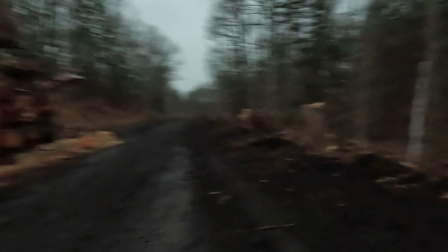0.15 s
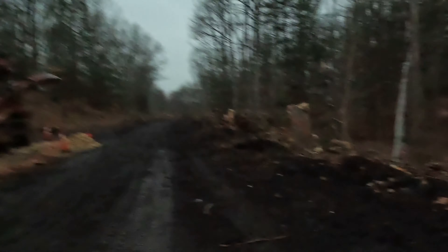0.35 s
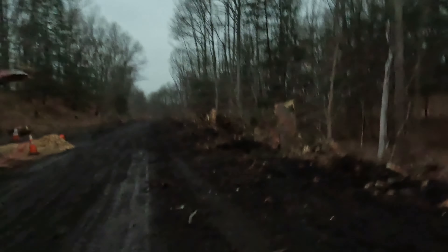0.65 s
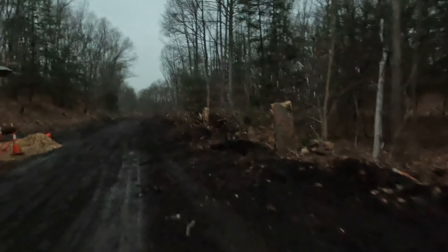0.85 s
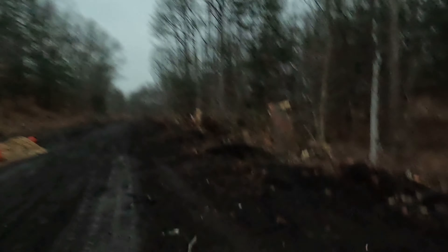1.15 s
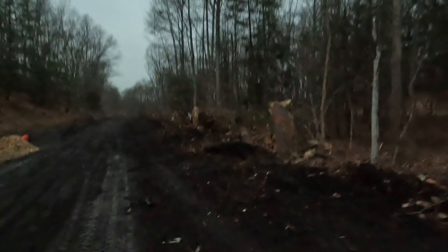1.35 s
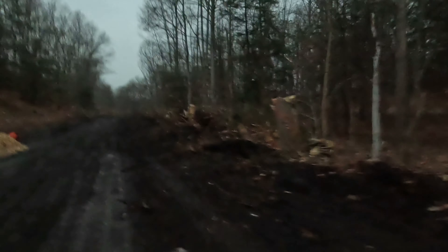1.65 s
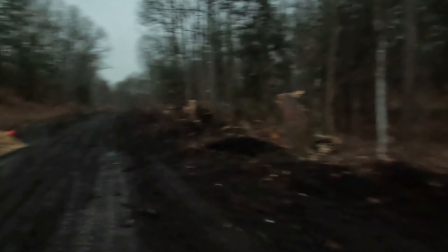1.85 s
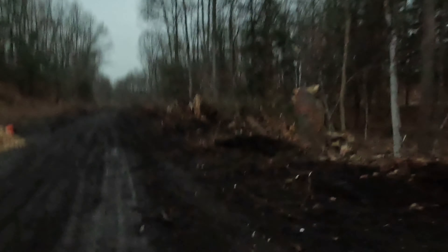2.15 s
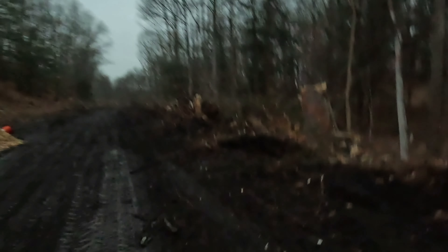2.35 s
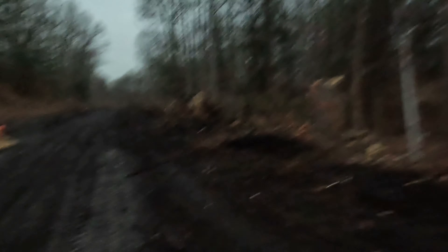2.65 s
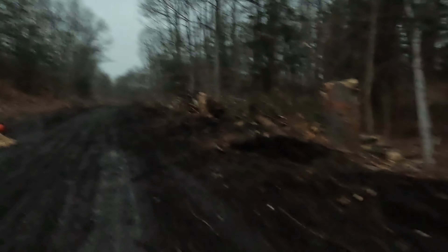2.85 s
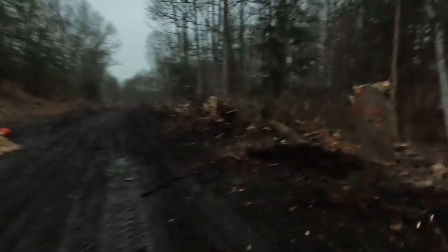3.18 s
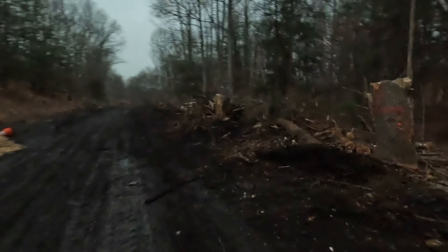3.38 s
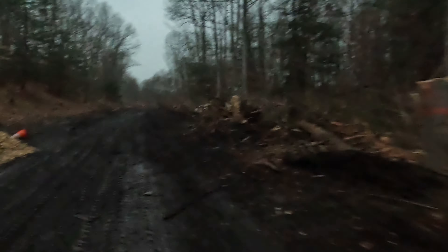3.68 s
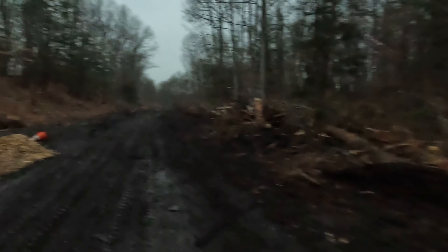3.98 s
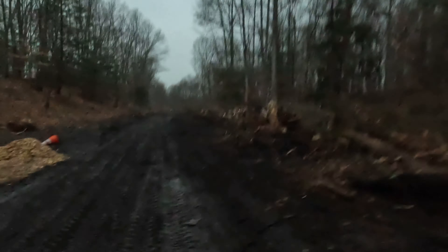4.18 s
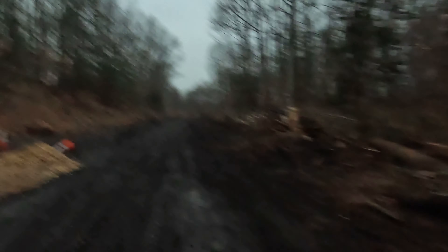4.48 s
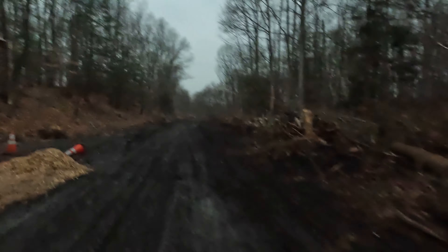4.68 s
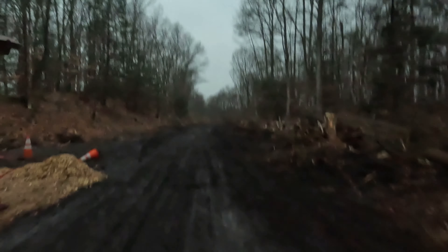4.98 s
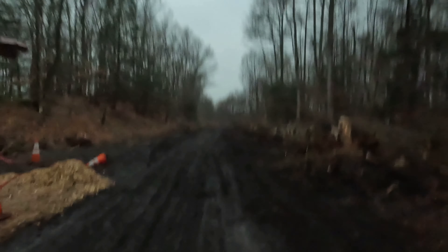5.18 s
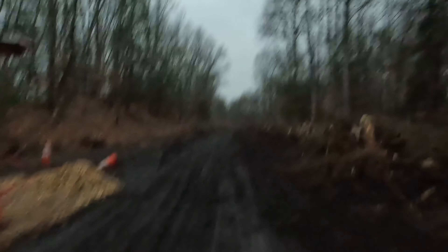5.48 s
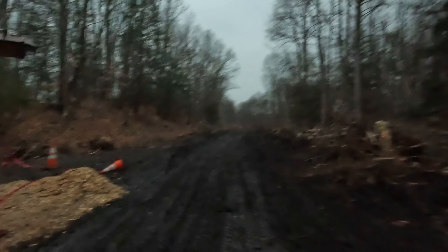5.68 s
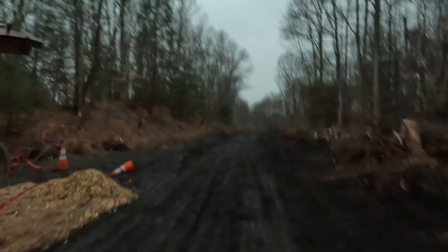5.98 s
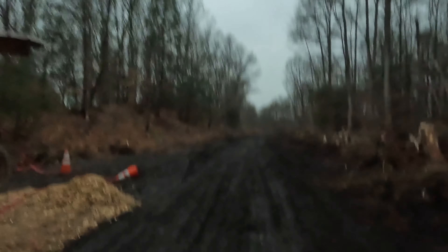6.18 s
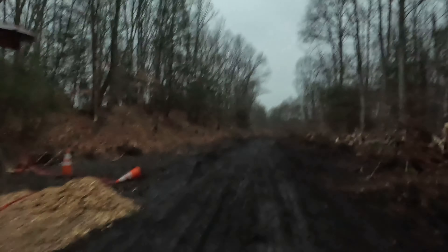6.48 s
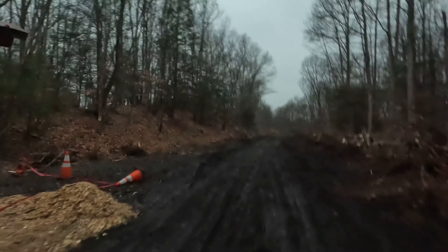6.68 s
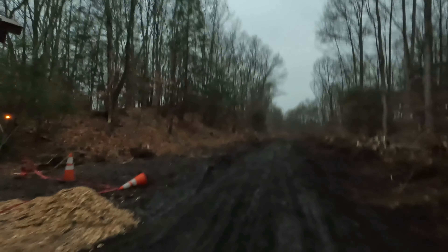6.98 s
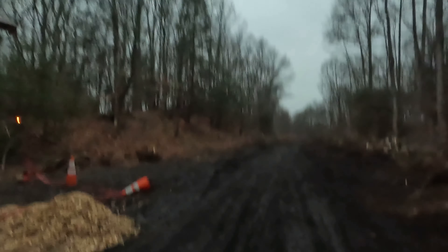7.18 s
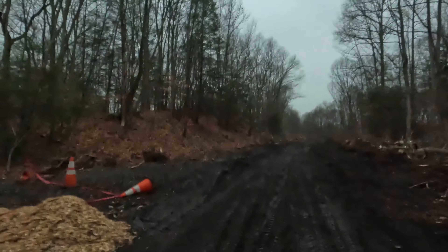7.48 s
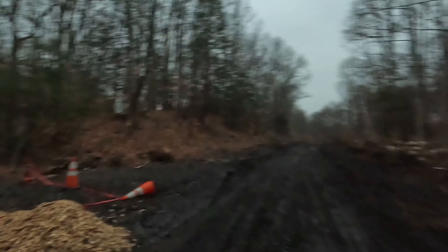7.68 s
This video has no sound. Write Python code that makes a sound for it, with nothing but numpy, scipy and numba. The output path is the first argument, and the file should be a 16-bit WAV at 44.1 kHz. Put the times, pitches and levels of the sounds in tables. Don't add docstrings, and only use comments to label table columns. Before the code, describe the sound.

Nearly eight seconds of walking on a soaked dirt track in woods, heard from a small handheld stereo microphone. Low wind rumble and flutter last throughout, swelling in short buffets with the arm's swing, over a faint steady hiss of fine rain. From 0 to 1 s soft boot thuds and gurgles alternate; at about 1.0 to 1.3 s a brighter wet squelch bursts with popping bubbles and sharp ticks. Lighter squishes follow near 1.5, 2.3 and 2.7 s, then thuds and sticky crackles from 3.2 to 3.8 s. Smaller squelches come around 4.2 and 4.4 s. At 5.1 s a crisp splash with bright ticks; at 5.55 s a heavy drop knocks the housing with a snap and low bump. Strong sucking steps at 6.1 to 6.3 s, then bubbling squelches and fine spray from 7.1 s to the end.

```python
import sys
import numpy as np
from scipy import signal
from scipy.fft import rfft, irfft, next_fast_len
from scipy.io import wavfile
from scipy.ndimage import uniform_filter1d
from numba import njit

SR = 44100
rng = np.random.default_rng(int(sys.argv[2]) if len(sys.argv) > 2 else 0)


def convert_level_to_amplitude(level_db):
    exponent = np.asarray(level_db, float) / 20
    return 10 ** exponent


def store_wav(level_fs):
    pcm = np.round(np.clip(np.atleast_2d(level_fs), -1, 1) * 32767)
    wavfile.write(sys.argv[1], SR, pcm.T.astype(np.int16))


N = 345679


def on_hz(table, hz):
    table = np.array(table)
    return np.interp(np.log(hz + 1), np.log(table[:, 0]), table[:, 1])


def curves(table):
    return np.interp(np.arange(N) / SR, *np.transpose(table))


def unit(x):
    return x / np.sqrt(np.mean(x ** 2))


def band(x, lo_hz, hi_hz, order=2):
    return signal.sosfilt(signal.butter(order, [lo_hz, hi_hz], "band", fs=SR, output="sos"), x)


def walk(rate_hz):
    hold = int(SR / rate_hz)
    levels = np.repeat(rng.standard_normal(N // hold + 1), hold)
    smooth = uniform_filter1d(uniform_filter1d(levels, hold), hold)
    return unit(smooth[:N])


def ports(colour, drops=0):
    # pitch_hz, likeness (0-1)
    likeness = [(60, 0.94), (250, 0.95), (640, 0.35), (1400, 0.47), (3100, 0.37), (5500, 0.61),
                (9000, 0.47), (13000, 0.02)]
    # pitch_hz, left_minus_right_db
    balance = [(60, -0.5), (110, 0.5), (200, -0.5), (380, -0.5), (700, 6), (1290, 3), (2380, 1),
               (4400, -0.5), (8120, 1), (13000, 5.5)]
    size = next_fast_len(N)
    hz = np.arange(size // 2 + 1) * SR / size
    alike = np.clip(on_hz(likeness, hz), 0, 1)
    lean_db = on_hz(balance, hz) / 2
    mid, side = rfft(rng.standard_normal((2, N)) + drops, size)
    mid, side = mid * np.sqrt(1 + alike), side * np.sqrt(1 - alike)
    pair = np.array([(mid + side) * convert_level_to_amplitude(lean_db), (mid - side) * convert_level_to_amplitude(-lean_db)])
    return unit(irfft(pair * convert_level_to_amplitude(on_hz(colour, hz)), size)[:, :N])


@njit
def ring(start, turn, fade, glide, left, right, count):
    out = np.zeros((2, count))
    for k in range(len(start)):
        z, p, swell, i = 1 + 0j, turn[k], 1., int(start[k])
        while abs(z) > .003 and i < count:
            out[0, i] += left[k] * z.imag * (1 - swell)
            out[1, i] += right[k] * z.imag * (1 - swell)
            z *= fade[k] * np.exp(1j * p)
            swell *= fade[k] ** 2
            p = min(p * glide[k], 3.)
            i += 1
    return out


def grains(s, size, hz, pan_db, cycles, rise):
    step = np.clip(hz, 10, 18000) / SR
    cycles = np.clip(cycles, .5, 40) + 0 * s
    near = (convert_level_to_amplitude(-pan_db / 2) + convert_level_to_amplitude(pan_db / 2)) / 5
    left, right = size * convert_level_to_amplitude(pan_db / 2) / near, size * convert_level_to_amplitude(-pan_db / 2) / near
    return ring(s * SR, 2 * np.pi * step, convert_level_to_amplitude(-60 * step / cycles), (1 + rise) ** step, left, right, N)


def swarm(rate_hz, lo_hz, hi_hz, cycles, rise, scatter_db, pan_db):
    when, pitch, luck, place = rng.random((int(rate_hz * N / SR), 4)).T
    size = convert_level_to_amplitude(-scatter_db * np.log(1 - .9 * luck))
    hz = lo_hz * (hi_hz / lo_hz) ** pitch
    return unit(grains(when * N / SR, size, hz, pan_db + 8 * (place - .5), cycles, rise))


def bursts(s, db, hz, pan_db, spread_s, detune_oct, cycles):
    late, pitch = rng.random((len(s), 6, 2)).T
    late[0], pitch[0] = 0, .5
    crack = grains(s, convert_level_to_amplitude(db + 1), .95 * hz, pan_db, 2.5, -.1)
    start_s = s + spread_s * late
    level = convert_level_to_amplitude(db - 13.6 * late)
    pitch_hz = hz * 2 ** (detune_oct * (pitch - .5))
    pans_db = pan_db * np.ones((6, 1))
    return crack + grains(start_s.ravel(), level.ravel(), pitch_hz.ravel(), pans_db.ravel(), cycles, 0.0075)


def rain():
    # pitch_hz, density_db (per Hz)
    hiss = [(600, -15), (860, -15.5), (960, -3.5), (1300, -1), (2500, 0.5), (5000, -2), (6000, -3),
            (7700, -7.5), (8200, -17), (9200, -17), (10400, -11.5), (11300, -17), (12400, -16.5),
            (15000, -31)]
    drops = 4.8 * (rng.random((2, N)) < .006) * rng.standard_normal((2, N))
    return ports(hiss, drops) * convert_level_to_amplitude(-48 + 0.17 * walk(3.13) + 0.62 * walk(30))


def mist(wet):
    top = signal.sosfiltfilt(signal.butter(2, 11500, "high", fs=SR, output="sos"), wet)
    return top * (convert_level_to_amplitude(2.3 * walk(22)) - 1)


def breeze():
    # start_s, level_db
    gust = [(0, -42.5), (.9, -42), (1.55, -45.5), (2, -41.5), (2.7, -40), (3.1, -42.5), (3.45, -43),
            (4, -45.5), (4.5, -43.5), (4.9, -46.5), (5.4, -45), (5.95, -48), (6.5, -43.5), (7, -46),
            (7.3, -45.5), (7.84, -40.5)]
    # centre_s, swell_db, half_width_s
    buffets = [(.26, 7.5, 0.062), (.61, 3, 0.022), (.74, -2, 0.044), (1.18, 8, 0.076), (1.72, 2.5, 0.058),
               (1.81, 6, 0.089), (3.03, 4.5, 0.069), (3.24, 5, 0.061), (3.58, 0, 0.037), (3.71, 7, 0.1),
               (4.21, 5.5, 0.13), (4.78, 4, 0.13), (5.15, 9.5, 0.067), (5.59, 12, 0.039),
               (5.76, 6.5, 0.081), (6.14, 7, 0.06), (6.3, 4.5, 0.05), (6.62, 1.5, 0.076), (7.12, 6, 0.12),
               (7.51, 4.5, .11)]
    # start_s, flutter_gain_db
    facing = [(0, 1.5), (1.3, -2), (1.9, -0.5), (2.3, 2.5), (2.8, 1), (3.2, -2), (3.7, -2), (4.4, 2.5),
              (5.9, -2), (6.38, 4), (6.8, -1), (7.84, 0.5)]
    t = np.arange(N) / SR
    swing_db = sum(db * np.clip(1 - np.abs(t - s) / (2 * wide), 0, 1) for s, db, wide in buffets)
    rumble_db = curves(gust) + swing_db
    flutter_db = -51 + 0.58 * (rumble_db + 45) + curves(facing)
    return rumble_db, flutter_db


def wind(rumble_db, flutter_db):
    # pitch_hz, density_db (per Hz)
    eddies = [(12, -4.5), (28, 0), (60, -2.5), (110, -7.5), (170, -13.5), (260, -18), (400, -26),
              (600, -31.5), (900, -34), (1300, -73)]
    rumble_db = np.minimum(rumble_db, -31) + 2.23 * walk(9)
    flutter_db = np.minimum(flutter_db, -43) + .7 + 2.1 * walk(30) + .8 * walk(6)
    deep = unit(band(ports(eddies), 11.0, 77.5)) * convert_level_to_amplitude(rumble_db)
    return deep + unit(band(ports(eddies), 85, 850)) * convert_level_to_amplitude(flutter_db)


def ticks():
    # start_s, level_db (peak), pitch_hz, top_db (top octave)
    hits = [(0.0908, -29.5, 4650, -62), (0.624, -40, 6500, -58), (1.0147, -26.5, 5300, -64),
            (1.0765, -35, 5530, -58), (1.1672, -36, 5180, -56), (1.21, -40, 5060, -45),
            (1.303, -33, 5310, -55), (2.0228, -38, 5070, -55), (2.1904, -35, 5400, -60),
            (2.2515, -30, 5040, -61), (2.2937, -37, 5130, -52), (2.6808, -41, 4380, -63),
            (2.7143, -33.5, 5190, -62), (3.237, -32, 5300, -55), (3.354, -29, 5710, -47),
            (3.4908, -30, 5740, -60), (3.775, -33, 5500, -58), (4.144, -36, 4220, -60),
            (4.2378, -38, 4240, -55), (5.105, -29, 5700, -58), (5.111, -33, 3860, -62),
            (5.1135, -26, 5950, -56), (5.359, -36, 5000, -58), (5.5432, -29, 6300, -48),
            (5.745, -42, 5000, -64), (5.93, -40, 6500, -60), (6.0256, -35, 5900, -58),
            (6.573, -30, 5030, -58), (6.7376, -36, 6260, -65), (7.555, -41, 4030, -50)]
    s, db, hz, top_db = np.transpose(hits)
    pan_db = 4 + 0 * s
    body = bursts(s, db - 8.5, hz, pan_db, .008, 0.51, 27)
    return body + bursts(s, top_db + 8.5, 9000 + 0 * s, pan_db, 0.0016, 0.99, 6.9)


def snaps():
    # start_s, level_db (peak), left_minus_right_db
    drops = [(0.624, -34, 9), (0.6714, -33, 2.0), (0.7302, -39, 1.0), (0.7554, -40, 0.5),
             (1.2087, -37, 2.5), (1.6534, -38, 1.0), (1.8603, -36, -0.5), (2.3014, -42, 0.0),
             (3.3538, -38, -3), (3.4014, -41, 0.5), (3.636, -37, 1.0), (4.1435, -44, 2.5),
             (4.5555, -40, 3.0), (5.5433, -33, 13), (5.7422, -32, 7.0), (5.758, -41, 2.5),
             (5.9274, -42, 2.0), (6.571, -37, 2.5), (6.7825, -40, 0.5), (7.5594, -43, 3.0)]
    s, db, pan_db = np.transpose(drops)
    lag_s = 0.000997
    return sum(grains(s + lag_s, convert_level_to_amplitude(db + gain_db), hz + 0 * s, pan_db, cycles, 0)
               for hz, gain_db, cycles in [(4700, 1.5, 4.8), (7200, -0.5, 5.3), (10900, -4, 6)])


def knock():
    # start_s, level_db (peak), pitch_hz, left_minus_right_db, cycles (to -60 dB),
    # push (relative size, positive push or negative pull)
    modes = [
        (5.5455, -17, 133, 24, 3.8, -1.4),
        (5.5489, -10.5, 76, 14, 4.0, 0.88),
        (5.5445, -15.5, 33, -30, 6.5, 0.85),
        (5.5478, -9.5, 105, -30, 1.9, 1),
        (5.5575, -18, 79, -30, 2.3, -1.1),
        (5.5462, -19, 3300, -8, 7.6, 0.96),
        (5.5436, -21, 1090, -18, 14, 0.9),
        (5.5426, -21, 86, -16, 1.6, 1),
        (5.5555, -29, 950, -16, 3.5, 0.9),
        (5.572, -20, 14, -8, 5, -0.93),
    ]
    s, db, hz, pan_db, cycles, push = np.transpose(modes)
    return grains(s, push * convert_level_to_amplitude(db - 6), hz, pan_db, cycles, -.03)


def bubbles():
    # start_s, level_db (peak), pitch_hz, left_minus_right_db
    surface = [(0.233, -43, 900, 4), (0.264, -42, 300, 1), (0.286, -48, 860, 7), (0.494, -43, 2230, 7),
               (0.715, -41, 600, 4), (1.013, -45, 2450, 5), (1.025, -44, 910, 5), (1.0145, -40, 1500, 6),
               (1.168, -43.5, 905, 8), (1.169, -46, 1800, 4), (1.184, -41, 1850, 3), (1.188, -40, 338, 1),
               (1.506, -42, 1630, 5), (2.303, -48, 507, 7), (2.321, -48, 905, 3), (2.331, -47, 950, 5),
               (3.252, -47, 463, 2), (3.467, -42.5, 1720, 4), (3.482, -45, 497, 1), (3.609, -41, 294, -4),
               (3.776, -44, 1640, 5), (4.259, -50, 990, 4), (4.401, -43, 1590, 2), (4.432, -42, 1840, 5),
               (5.113, -46, 550, 2), (5.182, -44, 2190, 5), (5.187, -41, 1430, 5), (5.878, -43, 950, 5),
               (6.123, -44, 940, 6), (6.142, -41, 1590, 5), (6.156, -41, 1460, 3), (6.205, -51, 680, 3),
               (6.219, -45, 960, 9), (6.489, -47, 1050, 5), (6.489, -47, 1940, 9), (6.581, -45, 910, 1),
               (6.88, -49.5, 640, 6), (7.089, -44, 1800, 4), (7.104, -42, 1670, 3), (7.105, -51, 810, 5),
               (7.145, -44, 2150, 5), (7.173, -44, 1160, 5), (7.195, -43, 1150, 4), (7.343, -46, 600, 5),
               (7.19, -45, 1600, 3), (7.58, -46, 1890, 3), (7.615, -50, 1080, 3), (7.638, -45, 1030, 3)]
    droplets = [(0.624, -45, 6710, 17), (0.675, -44, 4390, 4), (1.077, -46, 5500, -5),
                (1.182, -46, 7100, 2), (1.209, -47, 5080, -2), (1.279, -46, 4040, 0), (1.315, -55, 7920, 0),
                (1.514, -47, 5720, 1), (2.257, -45, 4600, 4), (2.294, -49, 7010, 3), (2.301, -52, 7700, -1),
                (2.681, -43, 4470, 0), (3.774, -48, 4560, 7), (3.775, -45, 5550, 3), (4.144, -52, 7750, 5),
                (4.144, -44, 5640, -1), (4.146, -47, 7100, 6), (4.153, -47, 4260, 2), (4.586, -46, 4130, 1),
                (4.6, -46, 4170, 1), (5.095, -46, 5590, 4), (5.11, -48, 7230, 8), (5.113, -33.5, 5800, 0),
                (5.113, -40, 3610, 8), (5.117, -40, 4170, 1), (5.139, -41, 4100, 6), (5.375, -45, 5680, 3),
                (5.392, -42, 5460, 0), (5.6, -49, 6800, 1), (5.7428, -47, 7500, 6), (5.7428, -41, 4950, 6),
                (5.928, -57, 8180, 1), (6.025, -51, 7490, 1), (6.572, -48, 6110, 3), (6.783, -51, 7490, -1),
                (7.555, -46, 5460, 3), (7.555, -49, 6840, 1), (7.559, -48, 7400, 7), (7.572, -46, 6800, 3)]
    s, db, hz, pan_db = np.transpose(np.concatenate([surface, droplets]))
    return grains(s, convert_level_to_amplitude(db + 4), hz, np.clip(pan_db, -8, 8), 5 + hz / 210, 0.0035)


def crackles():
    # start_s, level_db (peak), pitch_hz
    tears = [(0.737, -42, 950), (0.905, -40, 620), (3.411, -36, 3000), (3.399, -39, 2300),
             (7.089, -40, 1000), (0.756, -41, 600), (1.503, -37, 1500), (2.821, -38, 2200),
             (3.447, -42, 600), (3.459, -41, 750), (3.468, -40, 450), (3.477, -41, 1100), (3.489, -37, 330),
             (5.879, -34, 3600), (5.743, -39, 2900), (3.709, -39, 950), (3.7095, -38, 1750),
             (6.297, -39, 1000), (6.128, -35, 2500), (6.132, -33, 1050), (6.157, -33, 900),
             (6.183, -36, 1200), (6.194, -35, 1250), (6.207, -37, 1400), (6.222, -37, 1476),
             (7.117, -38, 1200), (7.146, -38, 2800), (7.161, -37, 1150), (7.7415, -35, 1000),
             (7.7421, -32, 300), (7.7458, -33, 330)]
    s, db, hz = np.transpose(tears)
    return grains(s, convert_level_to_amplitude(db + 0.5), hz, 3.5, 3.9, -0.033)


def pressure(s, db, hold_s, seep_db):
    attack_s, release_s = 0.0087, 0.031
    t = np.arange(0, N + 64, 64) / SR
    power = convert_level_to_amplitude(seep_db) ** 2
    for start, size_db, hold in zip(s, db, hold_s):
        rise = np.exp(np.minimum(t - start, 0) / attack_s)
        drain = np.exp(-np.maximum(t - start - hold, 0) / release_s)
        power = power + (convert_level_to_amplitude(size_db) * rise * drain) ** 2
    return np.interp(np.arange(N) / SR, t, np.sqrt(power))


def mud():
    # start_s, gurgle_db, hold_s, squelch_above_gurgle_db
    steps = [(0.01, -59, 0.09, 0), (0.22, -58, 0.07, 4.5), (0.437, -53.5, 0.069, -1), (.715, -57, 0.053, 0),
             (1.164, -57, .03, 2), (1.27, -57, 0.038, 8), (1.495, -64, 0.027, 6), (2.28, -59, 0.03, 3),
             (2.714, -61.5, 0.055, 1), (3.216, -57, 0.11, 0), (3.45, -53, 0.03, 0), (3.69, -58, 0.059, -1),
             (4.15, -61, 0.13, 0), (4.392, -54.5, 0.025, 2.5), (4.763, -64, 0.067, 8),
             (5.147, -56, 0.032, 5), (5.538, -58, 0.027, 0), (5.6, -58.5, 0.032, 4), (5.87, -66, 0.024, 0),
             (6.12, -58, 0.08, 2.5), (6.295, -63, .02, -6), (6.58, -62, 0.04, 4), (6.87, -55, 0.025, -3),
             (7.092, -60.5, 0.12, 6.5), (7.338, -56, 0.027, -4), (7.56, -60, 0.08, 5),
             (7.737, -57, 0.028, 0)]
    # start_s, spray_db, hold_s
    splashes = [(0.658, -57, 0.081), (1.16, -52.5, 0.023), (1.284, -56, 0.037), (1.49, -57, .03),
                (2.258, -58, .06), (3.36, -58, 0.13), (3.73, -58, .06), (4.133, -59, 0.025),
                (4.4, -58, .03), (5.102, -49, .04), (5.54, -57, 0.093), (6.117, -59, 0.033),
                (6.572, -55, .04), (6.816, -60, .04), (7.103, -54, 0.16), (7.287, -56, 0.037),
                (7.535, -53.5, 0.12), (7.765, -57, 0.035)]
    spurt = np.minimum(walk(50), 1.2)
    gurgle = swarm(750, 330, 900, 7, .02, 3.5, 2.5)
    squelch = swarm(1000, 900, 2300, 11, .02, 4, 2.5)
    spray = swarm(2000, 3000, 8500, 14, .01, 4, 1)
    s, db, hold_s, bright_db = np.transpose(steps)
    soles = gurgle * pressure(s, db, hold_s, -65)
    soles = soles + squelch * pressure(s, db + bright_db, hold_s, -61.5)
    return convert_level_to_amplitude(1.7 * spurt) * (soles + spray * pressure(*np.transpose(splashes), -61))


def boots():
    # start_s, level_db (peak), pitch_hz, left_minus_right_db
    landings = [(0.187, -31, 153, 2), (0.266, -27, 125, -0.5), (0.43, -35.5, 425, 4),
                (0.746, -32.5, 150, 1), (0.712, -30, 174, 1), (0.9, -42, 159, -1), (1.168, -27, 142, 1.0),
                (1.847, -31, 121, 0), (2.334, -36, 121, -2), (3.213, -32.5, 139, -2),
                (3.292, -30.5, 120, 0.5), (3.457, -37, 140, 0), (3.603, -34, 137, -10),
                (3.6735, -32, 170, 0), (3.685, -33, 150, 0), (4.674, -40, 224, 0.5), (5.111, -41, 124, 1),
                (3.774, -33.5, 149, -1), (6.109, -40, 153, -1), (6.157, -25.5, 159, 0),
                (6.296, -26.5, 165, -9), (6.58, -39.5, 226, 1.0), (6.608, -34.5, 147, 1.5),
                (6.789, -36, 121, -1.0), (6.876, -43, 152, -1), (7.142, -38, 130, 1.0),
                (7.209, -36, 229, 0.5), (7.267, -38, 121, 2), (7.522, -37.5, 232, -1), (7.739, -38, 200, 1)]
    # start_s, level_db
    # (peak), pitch_hz
    gulping = [(0.191, -39, 340), (0.431, -47, 410), (0.459, -44, 420), (0.712, -45, 450),
               (0.736, -35, 380), (0.754, -34, 480), (0.902, -34.5, 347), (1.166, -46, 331),
               (1.497, -41, 600), (1.817, -43, 439), (2.289, -47, 484), (2.712, -42, 468),
               (2.781, -34, 318), (3.211, -39, 314), (3.443, -42, 557), (3.708, -42, 339),
               (4.207, -39, 340), (4.393, -42, 619), (4.411, -44, 440), (5.595, -35, 290), (6.11, -33, 344),
               (6.155, -46, 316), (6.297, -36.5, 317), (6.607, -38, 496), (7.14, -37, 363),
               (7.268, -34, 431), (7.343, -37, 431), (7.692, -46, 468)]
    # start_s,
    # level_db (peak), pitch_hz, left_minus_right_db
    pockets = [(0.459, -35, 1540, 4), (0.925, -37, 1300, 6), (1.015, -26, 1390, 7), (1.185, -30, 1700, 7),
               (1.281, -37, 1370, 12), (1.3, -32, 1390, 6), (1.325, -32, 1020, 13), (1.493, -31, 2170, 9),
               (1.0145, -30, 2700, 4), (2.725, -31, 1400, 7), (2.821, -33.5, 1650, 12),
               (3.606, -27, 2670, 15), (3.709, -33.5, 1070, 7), (3.776, -37, 2180, 2.0),
               (4.26, -38, 1340, 7), (4.394, -33, 1240, 5), (5.111, -30, 2400, 3.0),
               (5.187, -29.5, 1430, 9), (5.5445, -35, 640, -18), (5.878, -36, 945, 6),
               (6.131, -31, 1080, 6), (6.19, -32, 1100, 8), (6.297, -37, 870, -10), (6.49, -36, 1500, 10),
               (7.088, -29, 1840, 3.0), (7.128, -28, 1250, 7), (7.435, -35, 1470, 2.5),
               (7.546, -37, 1180, 1.5), (7.615, -40, 1180, 2.5), (7.746, -37, 950, 9)]
    s, db, hz, pan_db = np.transpose(landings)
    slap = grains(s, convert_level_to_amplitude(db - 17), 3.3 * hz, pan_db, 4.8, -0.2)
    thud = grains(s + 0.00503, -convert_level_to_amplitude(db + 1.0), 0.96 * hz, pan_db, 3.25, -0.015)
    sag = grains(s + 0.01005, convert_level_to_amplitude(db - 5.0), .55 * hz, pan_db, 3.3, -.02)
    s, db, hz = np.transpose(gulping)
    gulps = grains(s, convert_level_to_amplitude(db - 3), hz, 1.5, 7, -.03)
    s, db, hz, pan_db = np.transpose(pockets)
    return slap + thud + sag + gulps + bursts(s, db - 11.0, hz, pan_db, .009, 0.65, 9.4)


def scene():
    air, wet = wind(*breeze()), rain()
    housing = ticks() + snaps() + knock()
    return air + wet + mist(wet) + housing + bubbles() + crackles() + mud() + boots()


def band_limit(x):
    return signal.sosfilt(signal.butter(12, 15660, fs=SR, output="sos"), x)


def record(dry):
    dull = signal.sosfilt(signal.butter(10, 14300, fs=SR, output="sos"), dry)
    return band_limit(dull)


dry = scene()
out = record(dry)
store_wav(out)
```